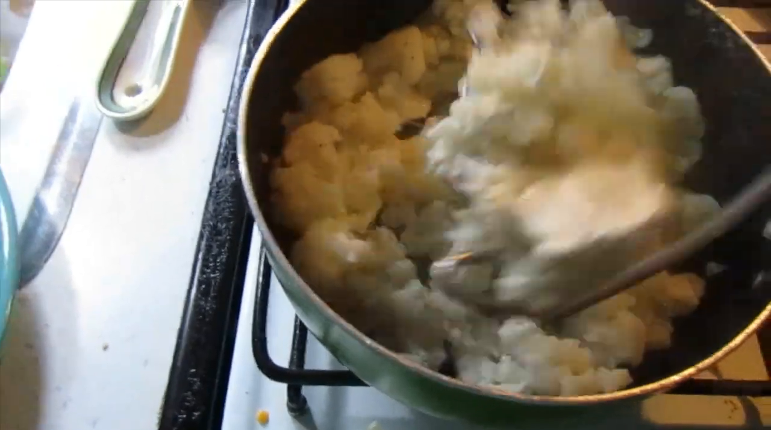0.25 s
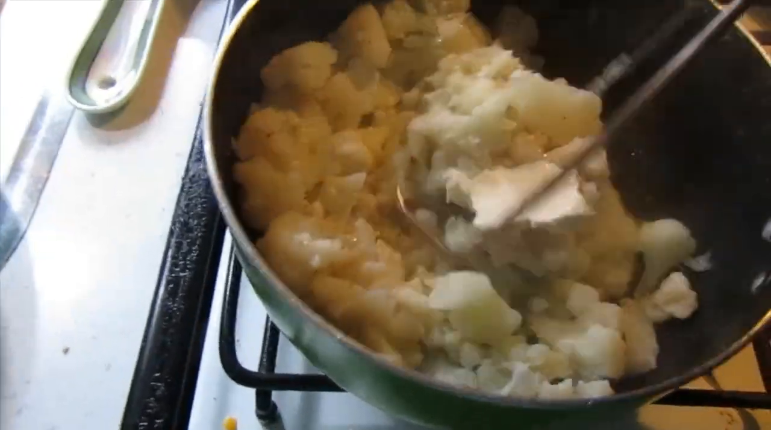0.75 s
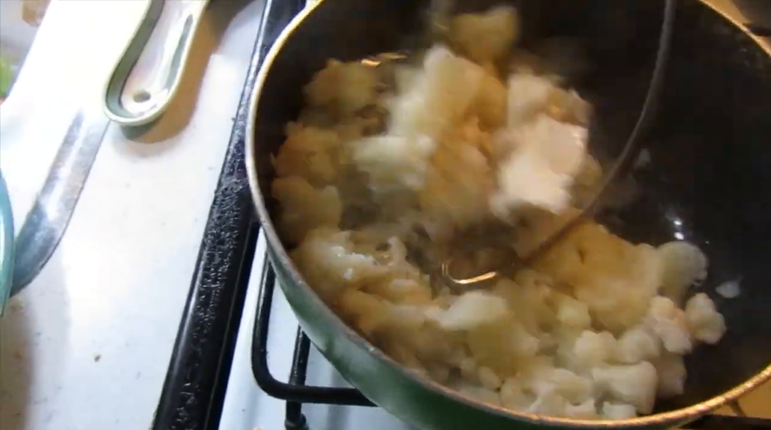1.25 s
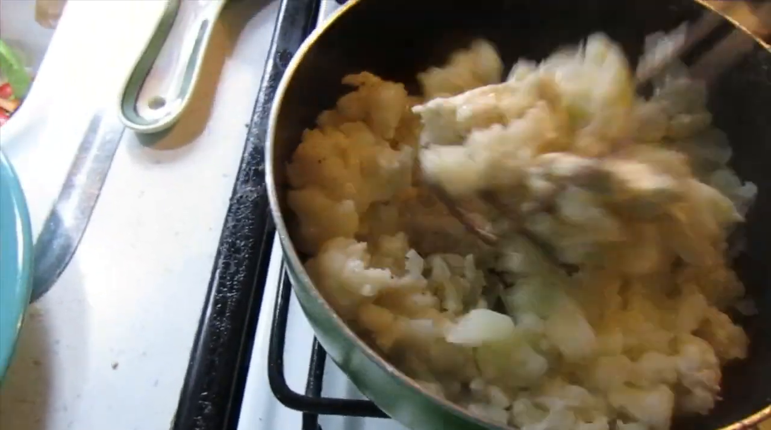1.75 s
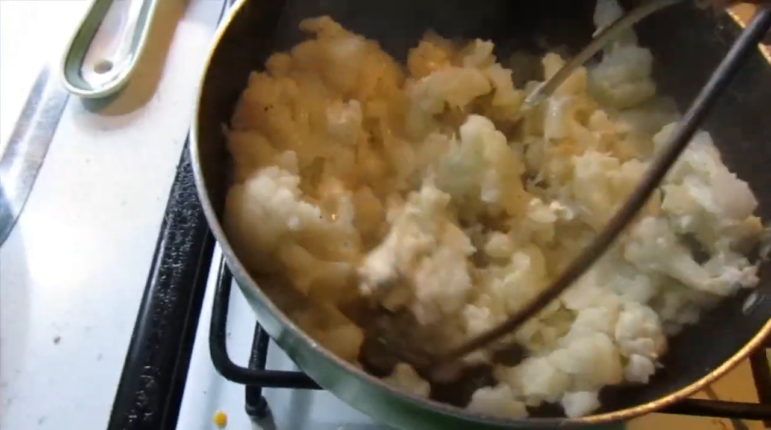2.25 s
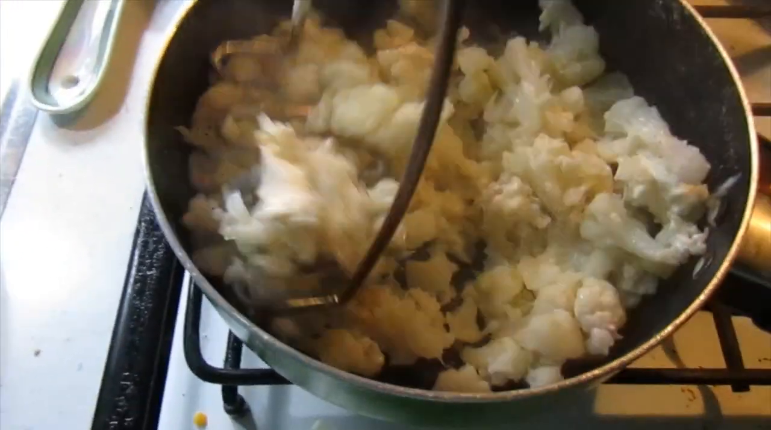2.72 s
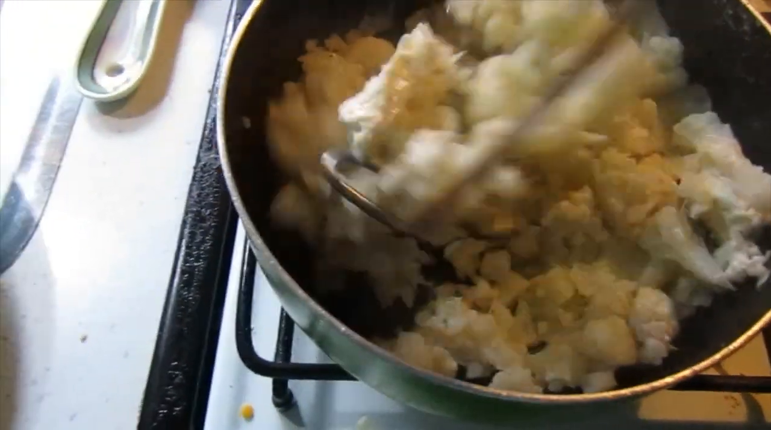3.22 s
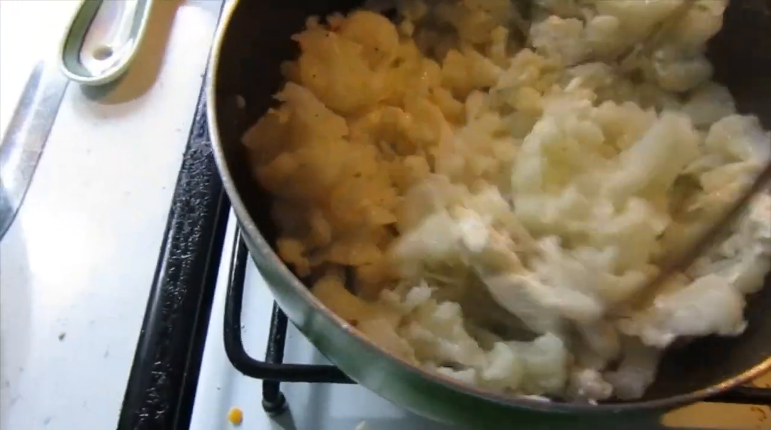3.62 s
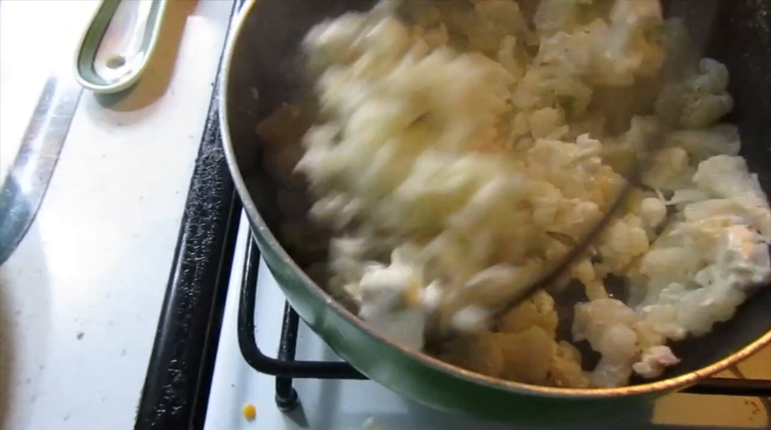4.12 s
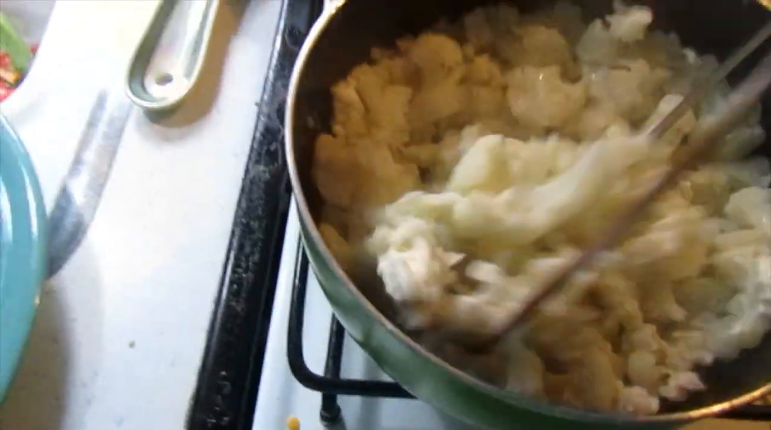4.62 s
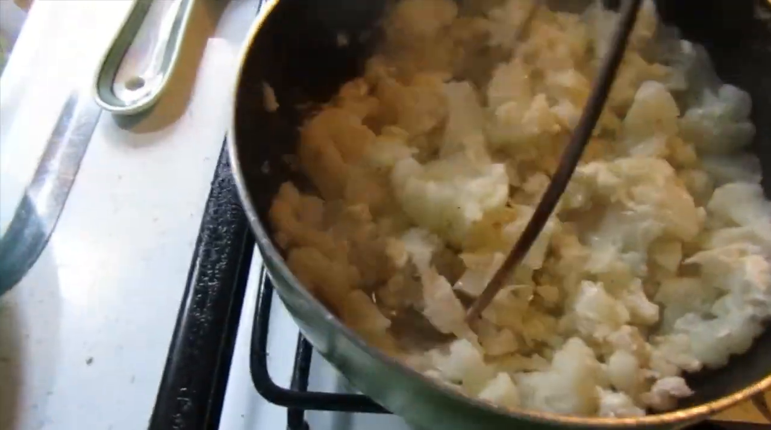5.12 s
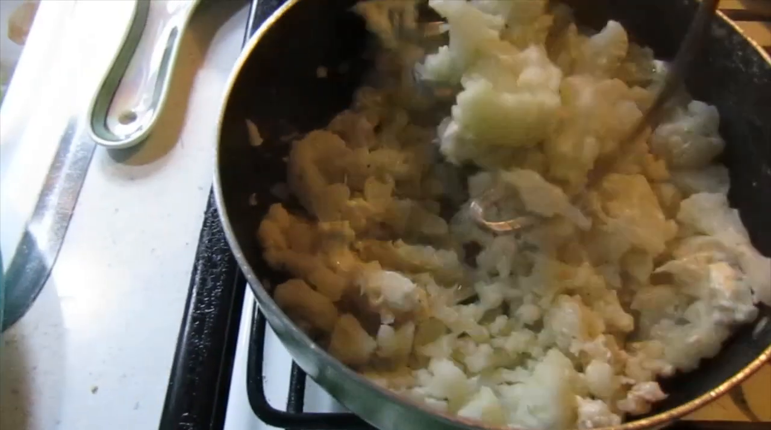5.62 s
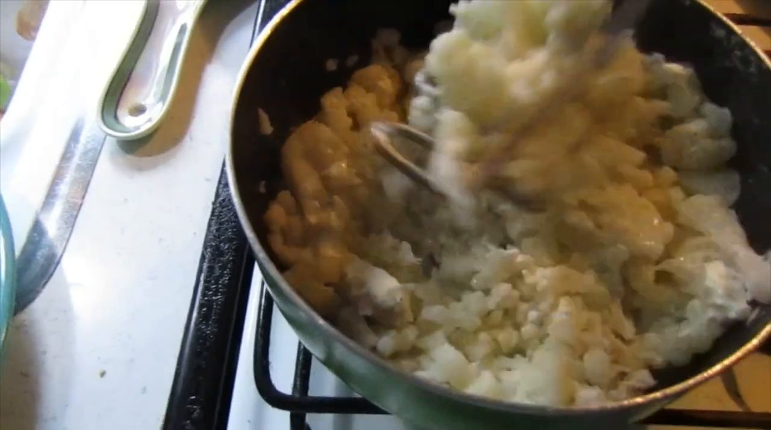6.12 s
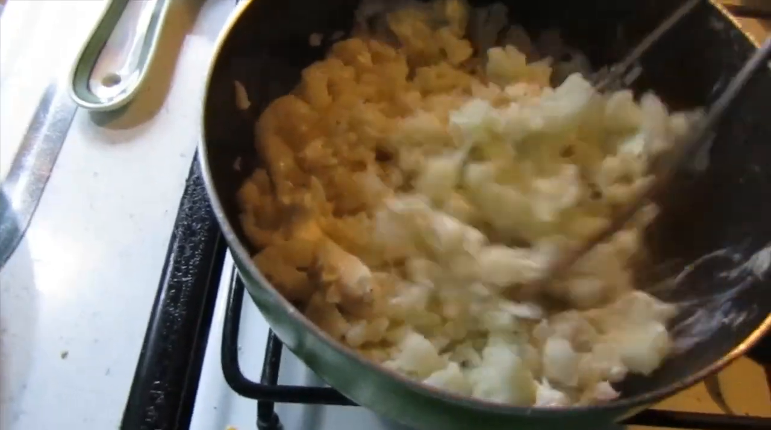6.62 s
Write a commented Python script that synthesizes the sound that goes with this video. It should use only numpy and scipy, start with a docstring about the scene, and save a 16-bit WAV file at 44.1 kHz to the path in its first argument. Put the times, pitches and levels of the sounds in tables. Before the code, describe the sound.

A wire masher works through soft cooked cauliflower in a metal pan on a stove. Sharp, briefly ringing clanks come unevenly, once or twice a second and often in quick clusters, mixed with duller knocks of the pan on the grate. Between them are quiet scrapes and wet squishes. The clanks are strongest around the middle. It sounds close, in a small kitchen, over faint hiss and hum.

```python
"""In a tiny kitchen, a wire masher works through soft vegetables in a saucepan on a gas-stove grate.
Impact excites the pan's damped modes as the wires clank on it and it knocks on the grate; friction
drives the same modes as wire and mash rub along the wall. The mash ticks wetly as it lets go, and air
squeezed through it whistles thinly. Beneath lie a mains hum and microphone hiss that slowly sink."""
import sys
import numpy as np
from scipy import signal
from scipy.fft import rfft, irfft
from scipy.io import wavfile
from scipy.ndimage import uniform_filter1d

SR = 44100
rng = np.random.default_rng(int(sys.argv[2]) if len(sys.argv) > 2 else 0)


def put_to_file(sound):
    """Save the sound as 16-bit audio at rate SR, in the file named by the first command-line argument."""
    columns = np.atleast_2d(sound).T  # one column per channel
    safe = np.clip(columns, -1, 1)
    whole_steps = np.round(safe * 32767)
    wavfile.write(sys.argv[1], SR, whole_steps.astype(np.int16))


N = 302526


def undb(db):
    return 10 ** (np.asarray(db) / 20)


def unit_rms(x):
    return x / np.sqrt(np.mean(x ** 2))


def band(x, lo_hz, hi_hz):
    return signal.sosfilt(signal.butter(2, [lo_hz, min(hi_hz, SR / 2.2)], "band", fs=SR, output="sos"), x)


def curves(table):
    """Linear interpolation of each column over the times in the first."""
    times, *columns = np.transpose(table)
    return [np.interp(np.arange(N) / SR, times, c) for c in columns]


def wander(rate_hz):
    """Slow random fluctuation of unit RMS."""
    hold = int(SR / rate_hz)
    steps = np.repeat(rng.standard_normal(N // hold + 1), hold)
    return unit_rms(uniform_filter1d(steps, hold)[:N])


def add(out, start_s, x):
    i = int(start_s * SR)
    out[i:i + len(x)] += x[:N - i]


def register(hz):
    """0 bass, 1 hollow body, 2 ring, 3 treble."""
    return np.digitize(hz, [600, 1300, 5000])


# The sinking background. Each row: time in seconds, hiss treble level in dB, hum level in dB.
BACKGROUND_LEVELS = [(0, -64.5, -52.5), (.45, -69.5, -63.5), (1.5, -60.5, -59.5), (2.6, -67.5, -58.5),
                     (3.6, -68.5, -60.5), (4.2, -71.5, -60.5), (4.8, -73, -66), (5.6, -76, -66),
                     (6.2, -73.5, -64), (6.86, -71, -69)]
# The colour of the hiss. Each row: frequency in Hz, relative spectral density in dB.
HISS_SPECTRUM = [(15, -35.5), (25, -8.5), (64, -0.5), (166, -1), (326, -8), (516, -13.5), (1020, -13.5),
                 (1130, -10.5), (1740, -21.5), (4500, -22), (4870, -19), (5250, -24.5), (10700, -28),
                 (14500, -30), (16000, -34)]


def hiss_and_hum(hum_hz=57.8, whine_hz=11822):
    """Superposition: broadband microphone hiss, a thin whine and a wavering mains hum."""
    hiss_db, hum_db = curves(BACKGROUND_LEVELS)
    f, t = np.fft.rfftfreq(N, 1 / SR) + 1, np.arange(N) / SR
    hz, db = np.transpose(HISS_SPECTRUM)
    colour = undb(np.interp(np.log(f), np.log(hz), db))
    hiss = irfft(rfft(rng.standard_normal(N)) * colour, N)
    hiss /= band(hiss, 5000, 15000).std()
    whine = undb(-12 + 5 * wander(20)) * np.sin(2 * np.pi * whine_hz * t + 1.5 * wander(40))
    hum_peak = np.sqrt(2) * undb(hum_db + 3.9 * wander(2.1))
    hum = hum_peak * np.sin(2 * np.pi * hum_hz * t + 0.49 * wander(0.45))
    return undb(hiss_db) * (hiss + whine) + hum


# Strokes along the pan. Each row: end of the rise and start of the fall in seconds, then rub, bass
# and squelch levels in dB. A stroke that falls before it has risen stays below these levels.
MASHER_STROKES = [(0, 0.0036, -49, -46.5, -64), (0.046, 0.12, -50.5, -71, -61),
                  (0.497, 0.5, -59.5, -62, -58), (0.59, 0.66, -46.5, -65, -50.5),
                  (0.693, 0.99, -51.5, -53.5, -55), (1.306, 1.42, -53, -60, -50),
                  (1.412, 1.386, -40.5, -63.5, -48), (1.576, 1.665, -51.5, -65, -51),
                  (1.62, 1.648, -43, -48.5, -60.5), (2.04, 2.05, -55, -42, -46.5),
                  (2.166, 2.385, -47.5, -49, -57), (2.787, 2.96, -42, -45.5, -53),
                  (2.909, 3.14, -60, -54, -57.5), (3.505, 3.47, -57, -68, -49),
                  (3.561, 3.59, -49.5, -65, -48), (3.66, 3.68, -48, -54.5, -54),
                  (3.74, 3.85, -56.5, -53.5, -54), (4.1, 4.32, -54, -51.5, -72),
                  (4.251, 4.285, -52.5, -50.5, -57.5), (4.281, 4.4, -48, -46.5, -58.5),
                  (4.544, 4.56, -46.5, -62.5, -56.5), (4.63, 4.45, -55, -65.5, -67),
                  (4.974, 5.057, -46.5, -47, -60.5), (5.1, 5.206, -45.5, -63.5, -58),
                  (5.729, 5.96, -55, -62, -56.5), (5.91, 6.04, -55, -58.5, -62),
                  (6.443, 6.59, -52.5, -75, -57), (6.62, 6.72, -58.5, -60.5, -59),
                  (6.875, 6.8, -38, -52, -30)]


def stroke_envelopes(rise_db_per_s=253, fall_db_per_s=302, settle_db_per_s=34):
    """Incoherent strokes add in power; each rises, falls fast, then fades slowly as the mash settles."""
    t, power = np.arange(0, N / SR, .002), 0
    settle_db = np.array([[-16.5], [-14], [-22]])  # rub, bass, squelch
    for start, end, *db in MASHER_STROKES:
        until, since = np.maximum(start - t, 0), np.maximum(t - end, 0)
        rise = undb(np.c_[db] - rise_db_per_s * until)
        fall = undb(-fall_db_per_s * since) + undb(settle_db - settle_db_per_s * since)
        power = power + (rise * fall) ** 2
    return curves(np.c_[t, np.sqrt(power).T])


# Modes of the loaded pan, rubbed or struck. Each row: frequency in Hz, relative level in dB for
# a wire's clank, the same for a knock on the grate, 60 dB decay time in seconds.
PAN_MODES = [(224.8, -6, -9, 0.29), (313.6, -5, -4.5, 0.3), (360.7, -0.5, -3, 0.34),
             (402, -4.5, -8.5, 0.29), (492.4, -2, -9.5, 0.18), (530, -9, -2.5, 0.17),
             (727.6, -14.5, -5.5, 0.24), (825, -15.5, -6, 0.13), (895.5, 2.5, -0.5, 0.072),
             (1032, -6, 0.5, 0.083), (1085, 8, -2, 0.092), (1497, -24, -3.5, 0.071),
             (1632, -7.5, -10.5, 0.13), (1737, 4.5, -3, 0.057), (1947, -6.5, -11, 0.06),
             (2040, -25, -13.5, 0.023), (2352, -2.5, -12.5, 0.1), (2625, -12, -1, 0.055),
             (2844, -21.5, -4.5, 0.057), (3140, -3.5, -11.5, 0.064), (3530, -4.5, -12.5, 0.084),
             (4200, 7.5, -10.5, 0.04), (4657, -5, -11, 0.031), (5397, 0.5, 1.5, 0.028),
             (5930, -6, -2.5, 0.022), (6310, -4.5, -2.5, 0.02), (6960, -7.5, -6.5, 0.04),
             (7670, -5.5, -1, 0.02), (9520, -7, -11.5, 0.035), (8580, -1, -8.5, 0.035),
             (10380, -4.5, -12.5, 0.038), (11290, 0.5, -5, 0.041), (12350, -5.5, -11.5, 0.052)]
# Dense small modes, heard as noise. Each row: band frequency in Hz, relative level in dB,
# 60 dB decay time in seconds.
DENSE_MODES = [(147, -5, 0.54), (227, -1, 0.31), (391, 7.5, 0.31), (865, -4, 0.39), (1486, 1, 0.21),
               (2540, 3, 0.14), (4030, 5.5, 0.13), (6370, 8, 0.1), (9070, 6, 0.098), (11800, -2, 0.13),
               (13100, -8.5, 0.13)]


def rubbing(rub_gain, bass_gain, squelch_gain, slips_per_s=900, squelch_hz=3500):
    """Stick-slip friction drives the pan's modes, blurred by the moving contact; mash squelches above."""
    slips = rng.random(N) < slips_per_s / SR
    slips = slips * undb(np.minimum(4.7 * rng.exponential(size=N), 17))
    slips *= np.sign(rng.standard_normal(N))
    drag = 0.68 * rng.standard_normal(N)
    pressure = undb(2.5 * wander(40))
    friction = (unit_rms(slips) + drag) * pressure
    layers = np.zeros((4, N))
    for hz, _, db, t60 in PAN_MODES[:17]:  # the lower modes take turns to sing
        half_width = 3.93 / t60
        resonance = unit_rms(band(friction, hz - half_width, hz + half_width))
        layers[register(hz)] += undb(db + 3 * wander(8.1)) * resonance
    for hz, db, _ in DENSE_MODES:
        shifted = np.roll(friction, int(hz))  # every band slips at its own moments
        noise = unit_rms(band(shifted, hz / 1.45, hz * 1.45))
        layers[3 if hz > squelch_hz else register(hz)] += undb(db - 1 + 3.5 * wander(45)) * noise
    octaves = np.log2(np.fft.rfftfreq(N, 1 / SR) + 1)
    dulling = undb(np.outer((-2, -2.5), octaves))  # the soft mash tilts ring and squelch, dB per octave
    layers[2:] = irfft(rfft(layers[2:]) * dulling, N)
    bass, body, ring, squelch = map(unit_rms, layers)
    return rub_gain * (undb(-6.5) * body + ring) + bass_gain * bass + squelch_gain * squelch


# Blows of wire on pan and pan on grate. Each row: time in seconds, level in dB, then bass, body and
# treble in dB relative to it, damping by the mash (1 is usual), contact time in milliseconds,
# frequencies of two leading modes in Hz.
PAN_IMPACTS = [(0.091, -44.5, -36, 0.5, -10.5, 1.6, 3, 1610, 8400),
               (0.1422, -28, -19.5, -11, -47, 0.97, 3, 1610, 1083),
               (0.6389, -31.5, -26, -21, -16.5, 0.5, 0.51, 1750, 5440),
               (0.832, -13, -48.5, -17.5, -27.5, 0.62, 3.9, 1635, 1065),
               (0.851, -24.5, -15, -10.0, -21, 0.69, 2.8, 1657, 1085),
               (0.9083, -24.5, -19.5, -15.5, -28, 0.79, 1.5, 1640.0, 5570.0),
               (1.2289, -6.5, -35.5, -28, -15.5, 0.99, 1.7, 1684, 8700),
               (1.295, -29, -22.5, -22, -23, 0.9, 0.44, 1640, 5570),
               (1.393, -25.5, -50.0, -33.0, -18, 0.71, 4.7, 2750, 5140.0),
               (1.4558, -16, -33.5, -39, -20.5, 1.3, 0.51, 2220, 7100),
               (1.627, -25.5, -55, -26, -45, 1.5, 2.8, 1640, 5260),
               (1.9962, -6.0, -34.5, -23.5, -15.5, 0.91, 1.04, 1682, 5340),
               (2.0862, -25, -32.0, -20, -28, 0.68, 1.3, 4630, 8440),
               (2.099, -18.5, -27, -21.5, -54, 1.6, 0.74, 2990, 6220),
               (2.159, -29.5, -31, -29, -24.5, 0.79, 2.7, 2780, 5800),
               (2.2192, -12, -36, -38, -42, 1.2, 0.52, 2940, 5200),
               (2.233, -8.5, -24.5, -19.0, -27.5, 0.96, 0.49, 1690, 1085),
               (2.701, -3, -42.5, -32.5, -21, 1.86, 1.44, 2580, 6460),
               (2.7236, -10, -31.5, -21.5, -16.5, 1.03, 0.47, 2570, 1055),
               (2.806, -20, -33, -19, -30, 2, 0.55, 4200, 836),
               (2.9483, -17, -22, -16, -23.5, 0.72, 0.92, 2340.0, 6070),
               (2.9928, -18.5, -25, -23, -26.5, 5, 0.15, 2540, 6000.0),
               (2.9972, -6.5, -27, -22, -33.5, 1.27, 0.56, 1683, 1027),
               (3.1857, -37, -23.5, -19.0, -26, 0.39, 3, 1507, 6600),
               (3.593, -37, -26, -25.5, -11, 1.8, 0.44, 2540.0, 5330),
               (3.6409, -16.5, -35.5, -38, -23.5, 1.54, 0.24, 4330, 5670),
               (3.8602, -6.5, -20, -17.5, -20, 2, 1.05, 2910, 934),
               (3.87, -16.5, -18, -10, -37, 0.96, 1.5, 2880, 809),
               (3.887, -15.5, -18, -10.5, -51.5, 0.58, 5.9, 2060, 880),
               (3.913, -6.5, -23.5, -23.5, -39.5, 0.79, 2.1, 2803, 930),
               (3.9544, -17.5, -30.5, -18, -30, 0.92, 0.63, 1630, 5390.0),
               (4.2348, -15.5, -28.5, -22.5, -33, 1.23, 0.53, 1860, 831),
               (4.359, -7.5, -37, -38, -24.5, 2.4, 0.73, 2960, 5230),
               (4.382, -5, -27.5, -21.5, -31.0, 1.13, 0.3, 1717, 1090),
               (4.531, -50, -17.5, 6, -15.5, 0.99, 5.1, 1570, 7250),
               (4.5849, -44.5, -13.5, -1.5, -15.5, 0.46, 3, 1900, 6100),
               (4.8892, -6, -35.0, -29.5, -13.5, 0.91, 2.2, 1732, 11340),
               (4.975, -24.5, -21, -12, -51.5, 1.6, 5.4, 1850, 808),
               (5.0633, -19.5, -19, -15, -20.5, 0.61, 0.33, 1550, 791),
               (5.098, -8, -39.5, -44, -33, 3.1, 0.3, 1730.0, 5500),
               (5.1143, -2.5, -29, -22.5, -31, 1.6, 0.24, 1710, 1084),
               (5.1464, -39.5, -11, -24.0, -6.5, 0.82, 2.6, 1520, 5900),
               (5.351, -42.5, -25, -26, -41, 0.79, 2.4, 1500, 6540.0),
               (5.443, -47, -18.5, -18, -37.0, 0.42, 1.6, 1490.0, 9900),
               (5.663, -16, -33, -19, -15.5, 0.93, 1.9, 1783, 882),
               (5.903, -22, -39, -24.5, -33, 1.6, 0.48, 2449, 1210),
               (6.3487, -8.0, -41, -26, -15.5, 1.3, 0.83, 1794, 3480),
               (6.3941, -20.5, -20.5, -14.5, -37, 1.27, 0.48, 1657, 1080),
               (6.44, -29.5, -23, -19, -52.0, 0.79, 5.4, 1440, 5110.0),
               (6.8083, -16.5, -38, -21, -15.5, 1.4, 0.8, 1850, 5370),
               (6.833, -12.5, -17, -12.5, -20, 1.2, 0.93, 1641, 890)]


def impacts(knock_treble_db=-16.5, clank_treble_db=-15, crack_s=0.0023, bass_swell_s=0.0063):
    """Impact excitation: each blow cracks, then the pan's modes ring freely and decay exponentially."""
    out, t = np.zeros(N), np.arange(SR * 3 // 10) / SR
    hz, clank_db, knock_db, t60 = np.array(PAN_MODES).T[:, :, None]
    tail_hz, tail_db, tail_t60 = np.array(DENSE_MODES).T[:, :, None]

    def noise(lo_hz, hi_hz):
        return unit_rms(band(rng.standard_normal(N + len(t)), lo_hz, hi_hz))

    tail_noise = np.array([noise(f / 1.434, f * 1.174) for f in tail_hz[:, 0]])
    dull, bright = noise(1200, 3750), noise(4500, 13900)
    registers = register(np.r_[hz[:, 0], tail_hz[:, 0]])
    chance = rng.standard_normal((len(PAN_IMPACTS), 3, len(PAN_MODES), 1))
    snap_time = t / .00008 - 3  # in pulse widths from the snap's centre
    snap_cycle = snap_time * np.exp(-snap_time ** 2 / 2)
    for blow, (spot, detune, phase) in zip(PAN_IMPACTS, chance):
        start, level_db, bass_db, body_db, treble_db, damping, contact_ms, *lead_hz = blow
        now = slice(int(start * SR), int(start * SR) + len(t))
        decay = -np.log(1000) * damping * t
        swell = 1 - np.exp(-(t / (0.74 * contact_ms / 1000)) ** 2)
        # the brighter the blow, the more it is wire on pan
        clank = np.interp(treble_db, [knock_treble_db, clank_treble_db], [0, 1])
        db = clank * clank_db + (1 - clank) * knock_db + 4 * spot  # the mix varies with the spot struck
        pitch, ring_s = hz * (1 + 0.0064 * detune), t60.copy()
        for f, lead_db in zip(lead_hz, (2.5, 4)):
            k = np.argmin(abs(hz - f))
            pitch[k] = f  # the nearest mode leads, bent by the load
            db[k] = db[register(hz) == register(hz[k])].max() + lead_db
            ring_s[k] *= .8  # the pressed wire shortens it
        modes = undb(db) * np.sin(2 * np.pi * pitch * t + 1.25 * phase) * np.exp(decay / ring_s)
        tail = undb(tail_db - 14) * tail_noise[:, now] * np.exp(decay / tail_t60)
        parts = np.r_[modes, tail] * swell
        bass, body, ring, treble = (parts[registers == r].sum(axis=0) for r in range(4))
        bass *= 1 - np.exp(-t / bass_swell_s)
        ringing = 0.69 * ring / abs(ring).max()
        for part_db, part in (bass_db, bass), (body_db, body), (treble_db, treble):
            ringing += undb(part_db) * part / part[:SR // 30].std()
        crack = dull[now] + undb(treble_db - clank_treble_db) * bright[now]
        crack *= 0.64 * swell * np.exp(-t * damping / crack_s)
        snap = np.exp(-(contact_ms / 0.95) ** 2) * snap_cycle * np.sign(phase[0])  # brief contacts only
        add(out, start - .0004, undb(level_db) * (ringing + crack + snap))
    return out


# The mash letting go. Each row: start in seconds, level in dB, centre frequency in Hz.
MASH_TICKS = [(.8074, -33, 6540), (1.1146, -36, 9500), (1.5524, -39, 4920), (1.36, -47, 9500),
              (1.4285, -34, 1900), (1.7374, -30, 11500), (1.748, -37, 5700), (1.7779, -39.5, 8050),
              (1.825, -39.5, 6030), (2.4593, -41, 5604), (3.1569, -40, 6930), (1.41, -23, 4600),
              (1.7964, -39, 7220), (4.0894, -60, 10730), (4.1274, -51.5, 10500), (4.2233, -34.5, 3900),
              (4.498, -40, 7900), (3.4715, -52, 1390), (3.485, -43, 2940), (3.5415, -33.5, 3950),
              (3.5491, -30, 5030), (3.5898, -36, 3400), (3.6164, -42, 10000), (3.6702, -41, 2990),
              (3.8341, -40, 10000), (3.8439, -36.5, 3990), (5.8217, -40, 3940), (6.0796, -46.5, 7387),
              (6.1852, -56.5, 4840), (6.4824, -41.5, 6300), (6.5274, -42, 6998), (6.545, -41.5, 6460),
              (6.6104, -43.5, 4810), (6.6363, -40, 5900)]


def wet_ticks(squelch_gain, small_per_s=130, cycles=6, idle_db=-72):
    """Damped transients: the mash lets go in brief ticks, and small random ones follow the squelch."""
    out, t = np.zeros(N), np.arange(SR // 100) / SR
    when, size, pitch = rng.random((int(small_per_s * N / SR), 3)).T
    squelch_db = 20 * np.log10(squelch_gain[(when * N).astype(int)] + undb(idle_db))
    small = np.c_[when * N / SR, squelch_db + 13 * size ** 2, 2500 * 5 ** pitch]
    ticks = np.r_[MASH_TICKS, small]
    for (start, db, hz), scatter in zip(ticks, rng.standard_normal((len(ticks), 6))):
        age = 2 * t * hz / cycles
        cluster = np.sin(2 * np.pi * (hz * t[:, None] * (1 + .13 * scatter) + scatter)).sum(axis=1)
        add(out, start, undb(db) * cluster * age * np.exp(-age))
    return out


# Thin whistles. Each row: start and end in seconds, pitch at the ends and at the top in Hz,
# level in dB before the flicker.
AIR_WHISTLES = [(1.875, 1.93, 12900, 13800, -65), (5.367, 5.648, 8400, 10120, -74),
                (5.76, 5.85, 12250, 14600, -68)]


def air_whistles(flicker_db=7):
    """Flow-excited tones: air squeezed through the mash arches in pitch, flickers and fades."""
    out, wobble = np.zeros(N), 1 + .012 * wander(40)
    for start, end, edge_hz, top_hz, db in AIR_WHISTLES:
        arch = 1 - np.linspace(-1, 1, int((end - start) * SR)) ** 2
        hz = (edge_hz + (top_hz - edge_hz) * arch) * wobble[:len(arch)]
        tone = np.sin(2 * np.pi * np.cumsum(hz) / SR)
        add(out, start, np.sqrt(2) * undb(db) * tone * arch)
    return out * undb(flicker_db * (wander(30) - 0.5))


def kitchen_reverb(x, t60_s=0.28, echo_db=-18):
    """Reverberation: close hard walls return a short, dull tail of dense reflections."""
    t = np.arange(SR // 2) / SR
    echoes = band(rng.standard_normal(len(t)), 260, 2750)
    echoes *= np.exp(-np.log(1000) * t / t60_s) * (t > .003)
    echoes /= np.sqrt(np.sum(echoes ** 2))
    return x + undb(echo_db) * signal.fftconvolve(x, echoes)[:N]


def scene():
    """Superposition of all sources in one channel; only impacts and ticks reverberate."""
    rub, bass, squelch = stroke_envelopes()
    transients = kitchen_reverb(impacts() + wet_ticks(squelch))
    return (transients + rubbing(rub, bass, squelch) + air_whistles() + hiss_and_hum())[None]


def record(dry, rolloff_hz=14000, cutoff_hz=16300):
    """Band limiting: the microphone rolls off the treble, saturates at full scale and cuts the top."""
    capsule = signal.sosfilt(signal.butter(2, rolloff_hz, fs=SR, output="sos"), dry)
    steep_lowpass = signal.ellip(10, .2, 75, cutoff_hz, fs=SR, output="sos")
    return signal.sosfilt(steep_lowpass, np.clip(capsule, -1, 1))


dry = scene()
out = record(dry)
put_to_file(out)
```